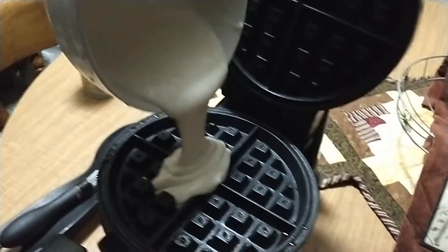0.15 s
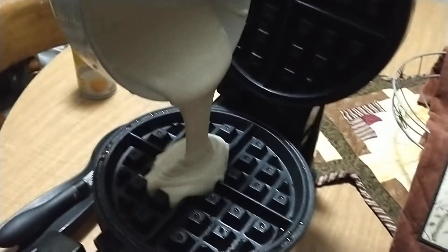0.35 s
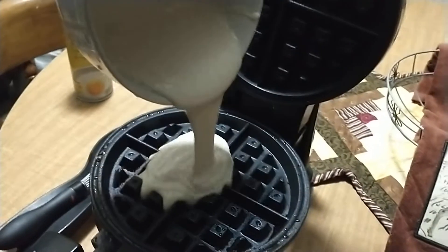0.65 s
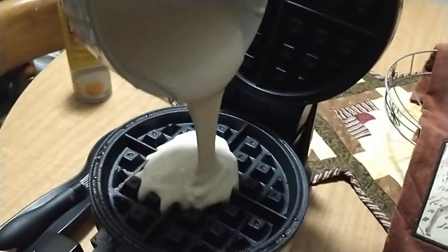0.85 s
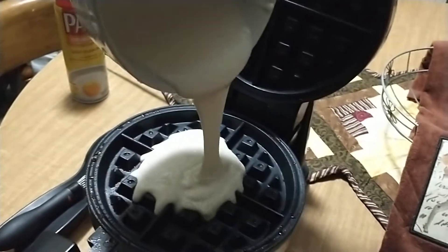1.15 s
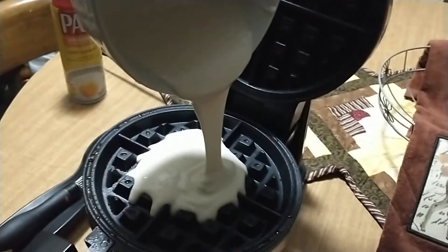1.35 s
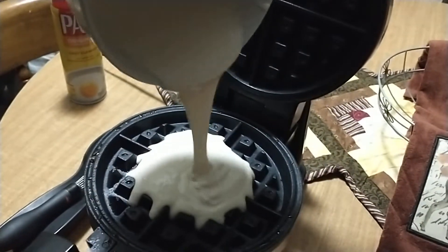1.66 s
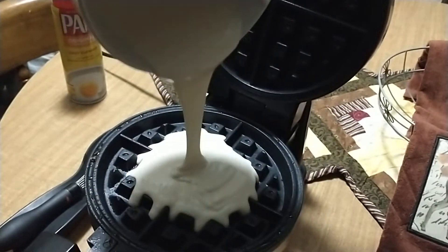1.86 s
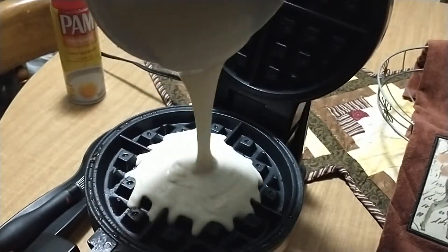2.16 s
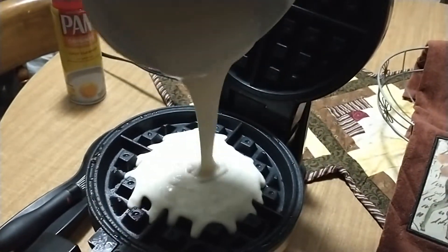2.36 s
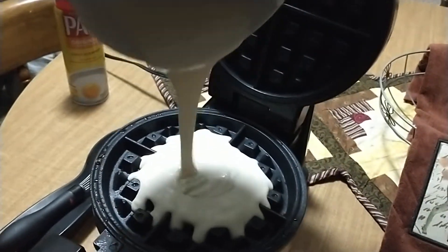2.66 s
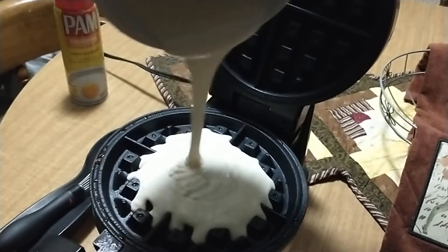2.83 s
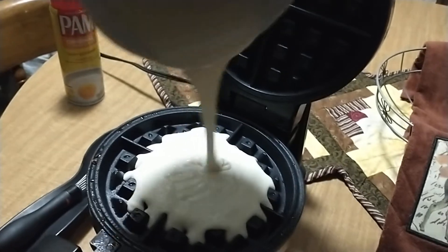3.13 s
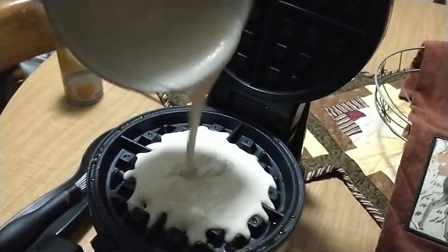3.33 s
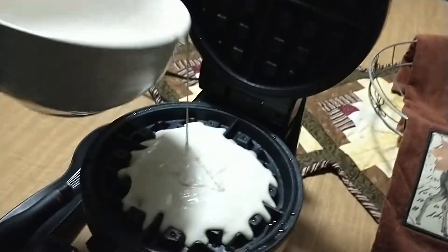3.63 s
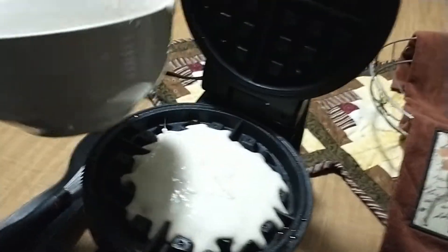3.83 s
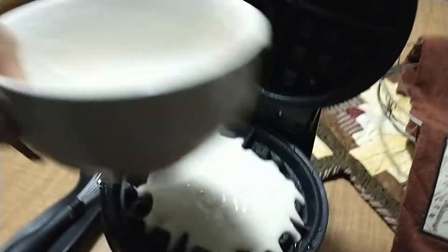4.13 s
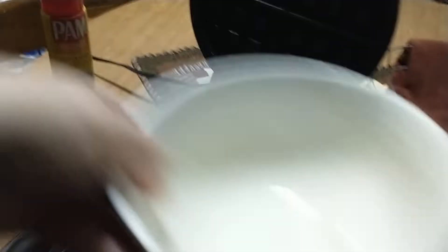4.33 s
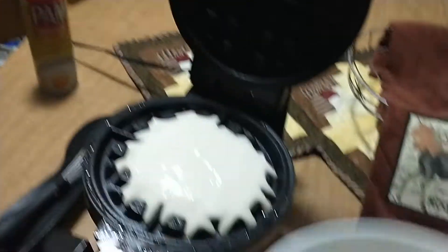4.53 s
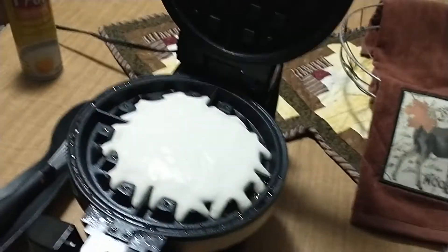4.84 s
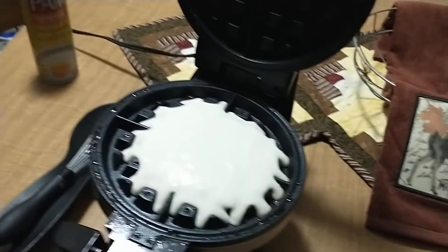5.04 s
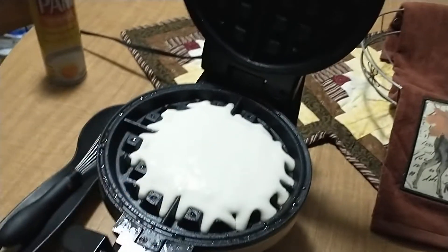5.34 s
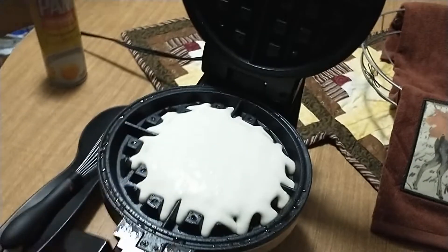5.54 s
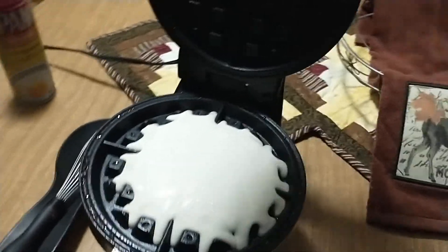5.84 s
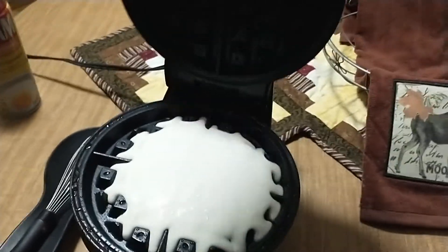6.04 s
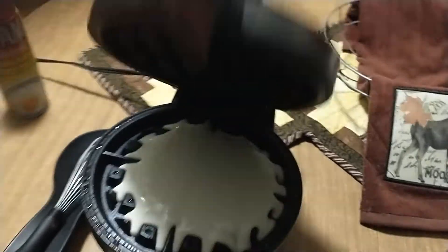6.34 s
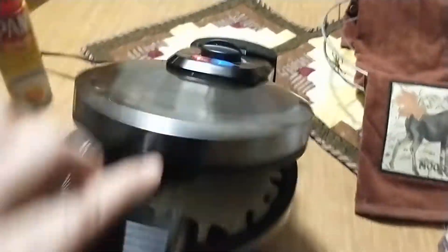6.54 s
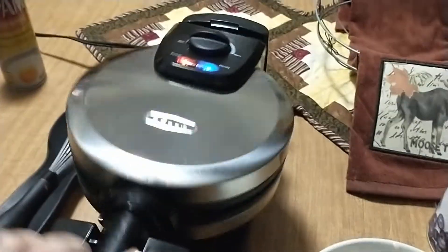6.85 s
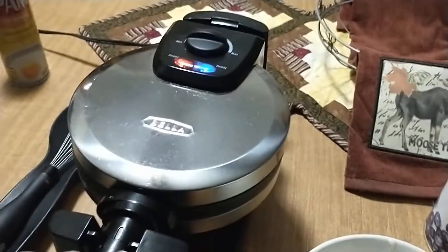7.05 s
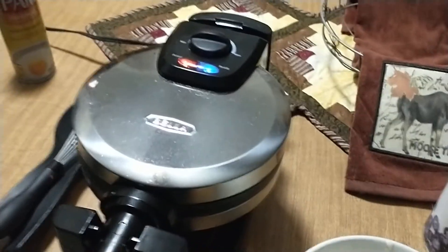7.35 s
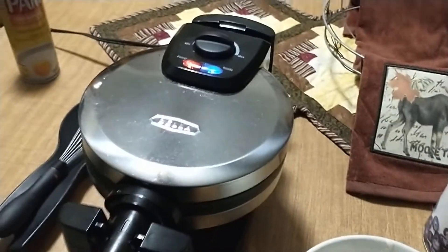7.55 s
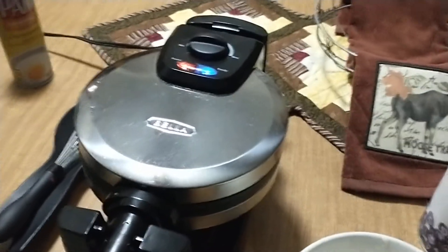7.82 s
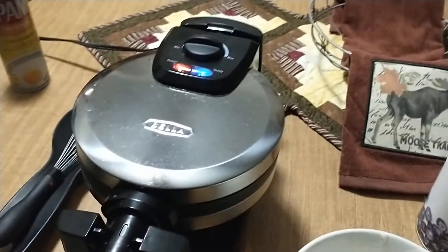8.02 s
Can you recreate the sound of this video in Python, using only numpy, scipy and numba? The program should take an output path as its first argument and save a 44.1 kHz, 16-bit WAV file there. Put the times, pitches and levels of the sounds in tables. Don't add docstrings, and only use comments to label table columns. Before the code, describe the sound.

A quiet, small kitchen with hard walls, captured in stereo by a phone just above a waffle iron. Low fridge hum, soft air noise, faint hiss and pipe drones that swell and recede lie behind. From 0 s batter fizzes weakly, its bubbling grain growing steadily through 4 s and turning finer and brighter, dotted with tiny dry spits, a sharper one near 2.8 s. At 4.3 s a hard bowl makes a short bright clink. Around 4.95, 5.1 and 5.15 s it bounces on the hollow table in three woody knocks. The sizzle continues with scattered pops. At 6.9 s the heavy lid drops with a solid clunk, followed at 7.0 s by a louder slam, rattling metallic latch clicks and a settling knock, with a brief room echo. The boil is smothered, fading by about 7.5 s into quiet hum, with one tiny tick near 8.1 s.

```python
import sys
import numpy as np
from scipy import signal
from scipy.fft import rfft, irfft, next_fast_len
from scipy.io import wavfile
from scipy.ndimage import uniform_filter1d
from numba import njit

SR = 44100
rng = np.random.default_rng(int(sys.argv[2]) if len(sys.argv) > 2 else 0)


def generate_wav(signal):
    frames = np.transpose(np.atleast_2d(signal))
    scaled = np.clip(frames, -1, 1) * 32767
    pcm = np.round(scaled).astype(np.int16)
    wavfile.write(sys.argv[1], SR, pcm)


def to_linear_factor(level_db):
    exponent = np.asarray(level_db, float) / 20
    return 10 ** exponent


N = 360738
T = np.arange(N) / SR
PAD = next_fast_len(N)


def level(x, db):
    return x * to_linear_factor(db) / np.sqrt(np.mean(x ** 2))


def read(table, hz):
    table_hz, value = np.transpose(table)
    return np.interp(np.log(np.maximum(hz, 1)), np.log(table_hz), value)


def colour(x, table):
    hz = np.arange(PAD // 2 + 1) * SR / PAD
    return irfft(rfft(x, PAD) * to_linear_factor(read(table, hz)), PAD)[:, :N]


def filtered(x, order, hz, kind):
    return signal.sosfilt(signal.butter(order, hz, kind, fs=SR, output="sos"), x)


def walk(rate):
    k = int(SR / rate)
    steps = np.repeat(rng.standard_normal(N // k + 1), k)
    return 0.45 * uniform_filter1d(uniform_filter1d(steps, k), k)[:N]


def swell(rows):
    return sum(db * np.exp(-((T - s) / half_s) ** 2) for s, half_s, db in rows)


def sides(db, pan_db):
    return to_linear_factor(np.stack([db + pan_db / 2, db - pan_db / 2], axis=-1))


# (frequency [Hz], correlation [-1..1])
PORT_LIKENESS = [(60, 1), (130, 0.87), (290, 0.84), (640, 0.27), (1410, 0.16), (3100, 0.29), (6820, -0.26),
                 (15000, 0.043)]


def diffuse(size):
    mid, side = rfft(rng.standard_normal((2, size)))
    alike = np.clip(read(PORT_LIKENESS, np.arange(size // 2 + 1) * SR / size), -.9, .99)
    return irfft(mid * np.sqrt(1 + alike) + side * np.sqrt(1 - alike) * np.array([[1], [-1]]), size)


def narrow(hz, width_hz, db):
    band_hz = [hz - width_hz / 2, hz + width_hz / 2]
    return level(filtered(diffuse(PAD)[:, :N], 2, band_hz, "band"), db)


# (frequency [Hz], decay time t60 [s])
KITCHEN_DECAY = [(60, 0.27), (150, 0.49), (400, 0.47), (1000, 0.4), (2500, 0.46), (6000, 0.17),
                 (14000, 0.46)]


def room(fade_s=0.17, gap_s=0.0013):
    t = np.arange(16000) / SR
    waves = rfft(diffuse(len(t)))
    hz = np.arange(len(t) // 2 + 1) * SR / len(t)
    tail = 0
    for centre_hz in 45 * 2 ** np.arange(9):
        octave = np.clip(1 - abs(np.log2(np.maximum(hz, 1) / centre_hz)), 0, 1)
        band = irfft(waves * octave, len(t))
        even = uniform_filter1d(np.mean(band ** 2, axis=0), int(5 * SR / centre_hz) + 150, mode="wrap")
        decay = to_linear_factor(-60 * t / read(KITCHEN_DECAY, centre_hz))
        tail = tail + band * np.sqrt(even.mean() / even) * decay
    ducking = 0.62 * np.exp(-(t / fade_s) ** 4.5) + 0.17
    tail = tail * ducking * np.clip((t - gap_s) / 0.00097, 0, 1)
    tail = tail * (1 + 0.64 * np.exp(-t / 0.015))
    return tail / np.sqrt(np.mean(np.sum(tail ** 2, axis=1)))


def echo(dry, tail, wet_db):
    return dry + to_linear_factor(wet_db) * signal.oaconvolve(dry.mean(axis=0, keepdims=True), tail, axes=1)[:, :N]


# (frequency [Hz], level [dB])
AIR_COLOUR = [(15, -70), (25, -40), (43, -10), (90, -9.5), (115, -6), (240, -6.5), (266, -12.5), (295, -4),
              (381, -12.5), (546, -10.5), (824, -17), (882, -17), (1500, -27), (1950, -56.5), (3300, -120)]
# (time [s], half length [s], rise [dB])
AIR_STIRS = [(6.2, 0.186, 2.6), (6.4, 1.6, 2)]
# (frequency [Hz], level [dB])
HISS_COLOUR = [(710, -32.5), (1200, -10.5), (1750, -5.5), (1850, -7), (2250, -8), (2730, -5), (3050, -6),
               (13000, -18.5), (16000, -22)]
# (frequency [Hz], rms level [dB])
FRIDGE_HUM = [(59.2, -88.5), (118.4, -78.5), (161.5, -83), (236.9, -86), (296.1, -89.5)]
# (frequency [Hz], width [Hz], resting level [dB])
PIPE_DRONES = [(562.8, 30, -90), (893.4, 24, -93.5), (1915, 91, -99)]
# (time [s], half length [s], rise [dB])
PIPE_SWELLS = [
    [(0.1, 0.66, 9), (1.5, 0.25, 14.5), (2.8, 0.3, 7), (3.95, 0.37, 8), (6.0, 0.36, 7)],
    [(0.2, 1, 9.5), (2.8, 0.32, 9.5), (3.8, 0.7, 8), (5.9, 0.6, -0.5), (7.8, .3, 6.5)],
    [(0.35, 0.46, 15), (1.5, 0.47, 13.5), (3.0, 0.29, 13), (3.9, 0.23, 10), (6.0, .3, 6)],
]


def kitchen():
    out = level(colour(diffuse(PAD), AIR_COLOUR), -72.5 + swell(AIR_STIRS))
    out = filtered(out, 3, 62, "high")
    muffle_db = np.interp(T, (8.1, 7.5), [0, -4])
    out += level(colour(diffuse(PAD), HISS_COLOUR), -76 + muffle_db)
    for hz, db in FRIDGE_HUM:
        out += np.sqrt(2) * to_linear_factor(db + .8 * walk(6)) * np.sin(2 * np.pi * hz * T + 0.78 * walk(2.5))
    for (hz, width_hz, db), rows in zip(PIPE_DRONES, PIPE_SWELLS):
        out += narrow(hz, width_hz, db + swell(rows))
    return out * to_linear_factor([[.6], [-.6]])


def click(shade, treble_db, turn_hz, size):
    hz = np.arange(size // 2 + 1) * SR / size
    shelf_db = treble_db / (1 + (turn_hz / (hz + 1)) ** 2)
    cepstrum = irfft(np.log(to_linear_factor(read(shade, hz) + shelf_db)))
    cepstrum[1:size // 2] *= 2
    cepstrum[size // 2:] = 0
    pulse = irfft(np.exp(rfft(cepstrum)))
    return -np.pad(pulse, (0, size)) / abs(pulse).max()


def blows(events, shade, rings, wet_db, chatter, fade_s, gap_s=0.0023, push_ms=.01, size=4096, turn_hz=1800):
    t = np.arange(2 * size) / SR
    out = np.zeros((2, N))
    for s, db, treble_db, pan_db, chatter_ms in events:
        blow = click(shade, treble_db, turn_hz, size)
        echoes = to_linear_factor(db + wet_db) * signal.fftconvolve(blow[None, :size], room(fade_s, gap_s), axes=1)
        start = int(s * SR)
        out[:, start:start + echoes.shape[1]] += echoes
        push = np.hanning(int(push_ms * SR / 1000) + 3)
        blow = 0.73 * np.convolve(blow, push / push.sum())[:len(t)] + .25 * blow
        for hz, ring_db, t60 in rings:
            scatter_db, turn = rng.standard_normal(2)
            decay = to_linear_factor(ring_db + 2.5 * scatter_db - 60 * t / t60)
            blow += decay * np.sin(2 * np.pi * hz * t + turn) * (1 - np.exp(-t / .0006))
        blow *= np.exp(-(t / fade_s) ** 4)
        dying = np.exp(-t[:size // 2] * 1000 / max(chatter_ms, .2))
        shared, left, right = rng.standard_normal((3, size // 2)) * dying
        contacts = chatter * (shared + 1.5 * np.diff([left, right], prepend=0))
        contacts[:, 0] = 1
        blow = signal.fftconvolve(blow[None], contacts, axes=1)[:, :len(t)]
        out[:, start:start + len(t)] += sides(db, pan_db)[:, None] * blow / abs(blow).max()
    return out


# (time [s], peak level [dB], extra treble [dB], left minus right [dB], chatter [ms])
BOWL_CLINK = [
    (4.2806, -20.5, 3, -7, 2.7),
]
BOWL_BOUNCES = [
    (4.9566, -15, -1.5, .6, 3.1),
    (5.0768, -14.5, -6.7, -0.098, 2.1),
    (5.157, -15.5, -4.5, -.6, 3),
]
# (frequency [Hz], level [dB])
CLINK_SHADE = [(300, -57), (600, -32), (2300, -21), (3500, -15), (4500, -7), (5200, 3.5), (6100, 2.5),
               (7200, -12), (8500, -17), (12500, -28), (16000, -56)]
TABLE_SHADE = [(18, -64.5), (30, -44), (118, -11), (194, -12.5), (273, -4.5), (437, -7), (649, -4.5),
               (1070, -7), (1320, -15.5), (1860, -16), (3310, -30), (5310, -25.5), (7090, -33),
               (13300, -44), (16000, -52)]
# (frequency [Hz], level [dB], decay time t60 [s])
BOWL_MODES = [(5040, -43, 0.28), (5060, -24, 0.25), (5600, -30, .1), (6300, -27, .06), (6500, -36, 0.17),
              (8600, -40, 0.11), (11600, -30, .012)]
TABLE_MODES = [(314, -34, 0.46), (410, -18.5, .12), (578, -34, 0.17), (651, -26.5, 0.105),
               (772, -22.5, 0.11), (1062, -17.5, 0.054)]


def bowl():
    out = blows(BOWL_CLINK, CLINK_SHADE, BOWL_MODES, wet_db=1, chatter=0.52, fade_s=.14)
    out += blows(BOWL_BOUNCES, TABLE_SHADE, TABLE_MODES, wet_db=6.5, chatter=0.06, fade_s=0.17,
                 gap_s=0.0036, push_ms=.6, turn_hz=3510)
    return filtered(out, 2, 70, "high")


# (time [s], peak level [dB], extra treble [dB], left minus right [dB], chatter [ms])
LID_DROP = [
    (6.855, -38, -17, 2.5, 4.5),
    (6.8755, -12.5, 6.5, 1.1, 2.6),
    (6.8785, -16, -9.5, 1.1, 4.1),
]
LID_SLAM = [
    (6.9895, -17.5, 4.5, 1.5, 3.5),
    (6.9933, -6.5, -1.5, 1.5, 8.2),
    (6.998, -15, -4.5, 1.5, 2.9),
]
LID_SETTLE = [
    (7.0315, -5.5, 3.5, 0.92, 2.8),
    (7.0375, -14.5, -8, 1, 3.4),
]
LATCH_CLICKS = [
    (7.0072, -4, .1, -0.5, 1.6),
    (7.0104, -8, .1, -2, 1.8),
    (7.0128, -5, 0.14, 3.5, 1.5),
    (7.0175, -17, .1, -3, 2.4),
    (7.0316, -8.5, .1, -11, 4.9),
]
# (frequency [Hz], level [dB])
LID_SHADE = [(18, -46), (30, -8.5), (227, -6), (666, -7.5), (822, -10.5), (1010, -13.5), (1320, -12.5),
             (1540, -19.5), (2060, -19), (3060, -27), (4420, -20.5), (5040, -28), (5450, -20.5),
             (14800, -50), (16000, -49.5)]
LATCH_SHADE = [(1180, -59), (2000, -21.5), (2180, -11.5), (2880, -12), (4190, -10), (4610, -10.5),
               (5390, -6.5), (7120, -6), (7700, -13), (15500, -48.5), (16000, -46)]
# (frequency [Hz], level [dB], decay time t60 [s])
DROP_MODES = [(216.3, -25.5, .15), (280, -24.5, 0.27), (583, -11, 0.23), (689, -11.5, 0.15),
              (856, -25.5, 0.087), (1402, -27, .08)]
SLAM_MODES = [(294.8, -10.5, 0.12), (428, -21, .1), (530, -11.5, .1), (710, -8.5, 0.08),
              (1300, -20.5, 0.066), (910.4, -31.5, 0.15)]
SETTLE_MODES = [(197, -8.5, .1), (274, -16.5, 0.23), (348, -29, .45), (543, -20, .2), (705.3, -20.5, .14),
                (1075, -18, 0.085), (1236, -13, 0.1), (3710, -50.5, .9)]
LATCH_MODES = [(4912, -33.5, 0.019), (5670, -29.5, 0.087), (5960, -32, .15), (6500, -33, .06),
               (7460, -25, 0.02), (6960, -29, 0.076)]


def lid_and_latch():
    out = blows(LID_DROP, LID_SHADE, DROP_MODES, wet_db=4, chatter=0.11, fade_s=.2)
    out += blows(LID_SLAM, LID_SHADE, SLAM_MODES, wet_db=0.5, chatter=0.034, fade_s=0.067)
    out += blows(LID_SETTLE, LID_SHADE, SETTLE_MODES, wet_db=3.5, chatter=.08, fade_s=0.19)
    out += blows(LATCH_CLICKS, LATCH_SHADE, LATCH_MODES, wet_db=-0.5, chatter=0.34, fade_s=.17)
    out[1] = np.roll(out[1], 7)
    return filtered(out, 2, 105, "high")


@njit
def bubbles(start, hz, cycles, size, lag):
    out = np.zeros((2, N + 4000))
    for k in range(len(start)):
        p = np.exp((2j * np.pi - 3 / cycles[k]) * hz[k] / SR)
        for c in range(2):
            at = start[k] + c * lag[k]
            i = int(at) + 1
            z = 2 * size[k, c] * p ** (i - at)
            rise = abs(p) ** 2
            for n in range(min(int(2 * cycles[k] * SR / hz[k]), 3000)):
                out[c, i + n] += z.imag * (1 - rise)
                z *= p
                rise *= abs(p) ** 2
    return out[:, :N]


# (time [s], level [dB])
BOIL_LEVEL = [(0, -75), (.96, -69), (2.14, -66.5), (2.8, -65), (3.5, -67.5), (4.1, -64.5), (4.5, -70),
              (5.0, -65), (6.3, -67), (6.6, -68), (7.0, -72.5), (7.2, -77), (7.55, -82), (8.18, -89.5)]


def boil(s):
    return np.interp(s, *np.transpose(BOIL_LEVEL))


def drying(s):
    return np.interp(s, (.8, 3.8), (-10.5, 1.5))


# (time [s], peak level [dB], pitch [Hz], fine spray over the spit [dB])
FAT_SPITS = [(0.7377, -48, 6000, -33), (0.839, -41.5, 5670, -40), (1.6658, -45, 6500, -15),
             (1.7542, -41.5, 5830, -29), (2.3427, -46, 5760, -11), (2.5113, -54, 5880, -19),
             (2.53, -43, 6060, -7), (2.5653, -51.5, 5820, 0), (2.7136, -47, 5330, -31),
             (2.7694, -49, 5880, -15), (2.8066, -33, 6260, -35), (3.2938, -42.5, 5650, -19),
             (3.3247, -49, 5730, -3), (3.5922, -45, 6600, -10), (3.619, -51, 6970, -1.5),
             (3.9494, -45, 5780, -13), (4.021, -52, 5760, -22), (4.865, -43.5, 6630, -27),
             (4.8918, -46, 5600, -17), (5.3317, -45.5, 5800, -4), (5.3867, -42, 5250, -9),
             (5.4555, -42.5, 5370, -13), (5.5243, -49.5, 6200, -13), (5.9518, -53, 6200, 0),
             (5.9707, -38.5, 4330, -12.5), (6.0284, -45, 5950, -10), (6.162, -54, 5780, 0),
             (6.4155, -45, 5660, -15), (6.5206, -40, 6730, -16), (8.12, -61, 4720, -10)]


def spits(tail, count=12, size=130):
    chance, loudness, pitch = rng.random((size, 3)).T
    s = chance * N / SR
    scatter_db = -2.5 * np.log(loudness) * (loudness > .05)
    small = [s, boil(s) + 11.5 + scatter_db, 6000 * 2 ** (0.32 * (pitch - .5)), -11 + drying(s)]
    rows = np.vstack([FAT_SPITS, np.transpose(small)])
    pan_db = np.repeat(-2.5 + 2.14 * rng.standard_normal(len(rows)), count)
    s, db, hz, fine_db = np.repeat(rows, count, axis=0).T
    delay, pitch, softness = rng.random((len(s), 3)).T
    spray = np.arange(len(s)) % 2
    bubble_hz = np.where(spray, 7500 + 8000 * pitch, hz * 2 ** (1.0 * (pitch - .45)))
    bubble_db = db + 3.0 - 3 * softness - 7 * delay + spray * (fine_db + 10.0)
    start = (s + 0.0015 * delay ** 1.8) * SR
    knots = bubbles(start, bubble_hz, 4 + 2.2 * spray, sides(bubble_db, pan_db), 0 * s + 7.5)
    return echo(filtered(knots, 3, 3300, "high"), tail, wet_db=-10)


# (frequency [Hz], level [dB])
FIZZ_SHADE = [(650, -49.5), (1100, -24.5), (1190, -28.5), (1320, -19.5), (1720, -25.5), (1900, -18.5),
              (2300, -17), (2850, -16), (4500, -3.5), (5840, -1), (8260, -7), (11700, -6.5), (15100, -6),
              (16000, -15.5)]


def fizz(tail, count=40000):
    when, pitch, length, loudness, place, lag = rng.random((count, 6)).T
    size = sides(np.minimum(-2.4 * np.log(loudness), 13), 5.0 * (place - .5))
    grains = bubbles(when * N, 900 + 15500 * pitch, 1.5 + 5.2 * length, size, 4.47 + 5.5 * lag)
    grains = colour(echo(grains, tail, wet_db=-3.5), FIZZ_SHADE)
    coarse = signal.sosfiltfilt(signal.butter(4, 5000, fs=SR, output="sos"), grains)
    fine = signal.sosfiltfilt(signal.butter(4, 8000, "high", fs=SR, output="sos"), grains)
    out = level(coarse, boil(T) - 5.5 + 0.97 * drying(T))
    out += level(grains - coarse - fine, boil(T) + .6)
    out += level(fine, boil(T) + drying(T))
    out += narrow(3950, 590, -76 - 45 * np.maximum(T - 7.27, 0))
    out += narrow(9300, 500, -92.5)
    return out * to_linear_factor(0.57 * walk(54) + 2.2 * walk(9)) * to_linear_factor([[-.8], [.8]])


def scene():
    tail = room()
    return kitchen() + bowl() + lid_and_latch() + spits(tail) + fizz(tail)


def roll_off(x):
    return signal.sosfilt(signal.butter(12, 16660, fs=SR, output="sos"), x)


def record(dry):
    rounded = .9 * np.tanh(dry / .9)
    mix = signal.sosfilt(signal.ellip(8, .2, 60, 15950, fs=SR, output="sos"), rounded)
    return roll_off(mix)


dry = scene()
out = record(dry)
generate_wav(out)
```